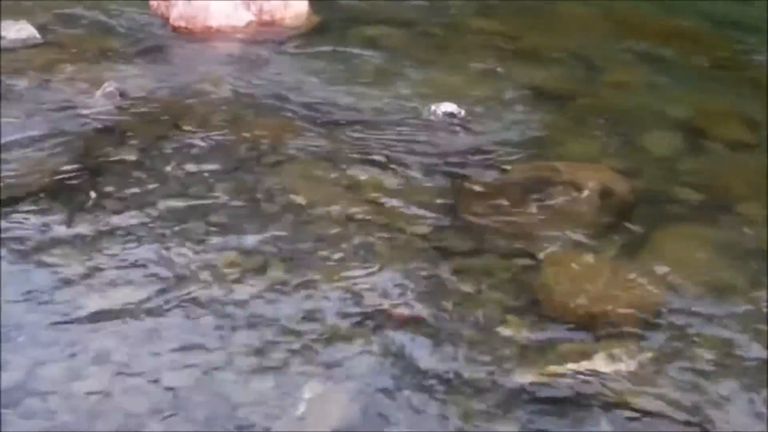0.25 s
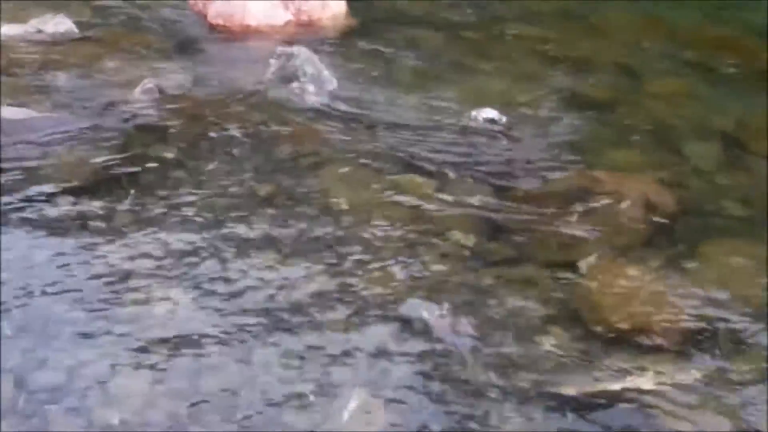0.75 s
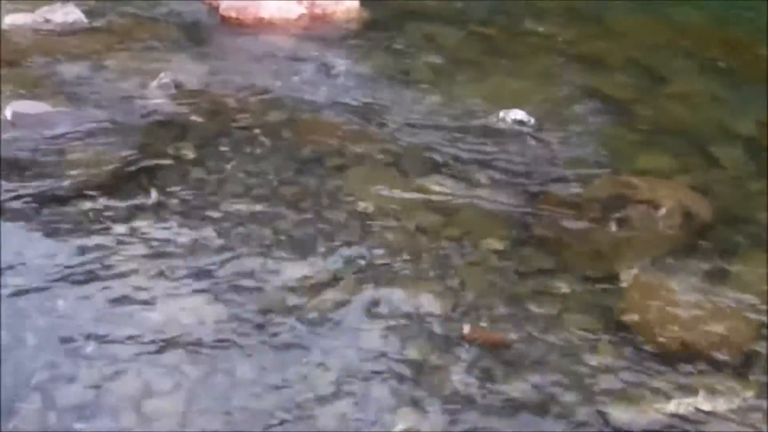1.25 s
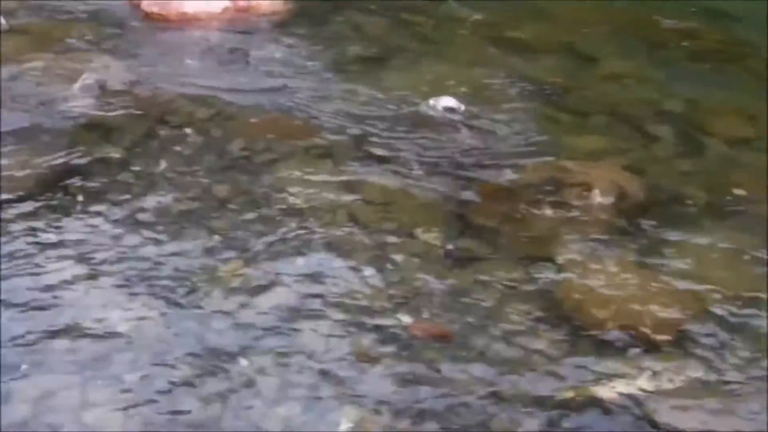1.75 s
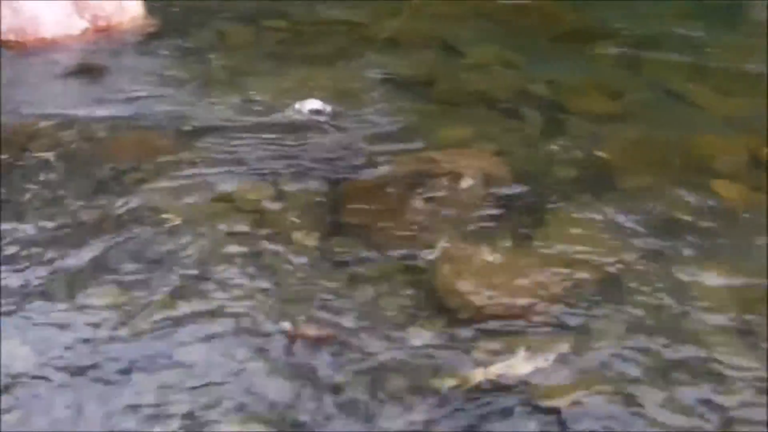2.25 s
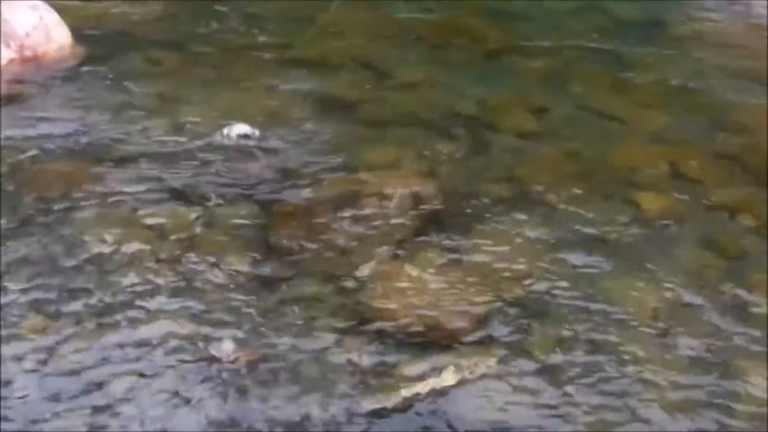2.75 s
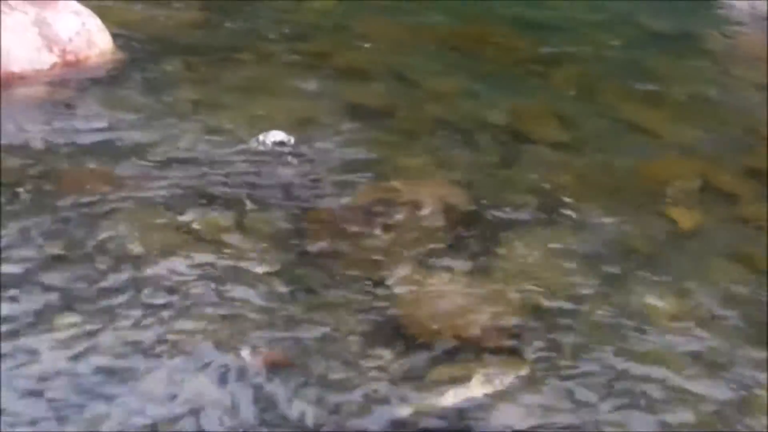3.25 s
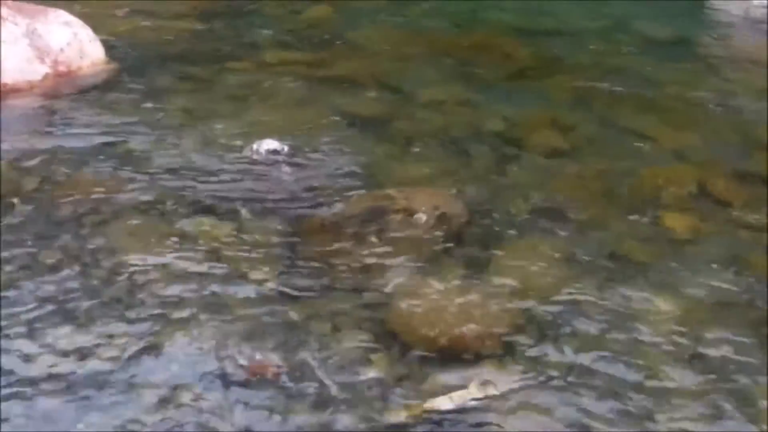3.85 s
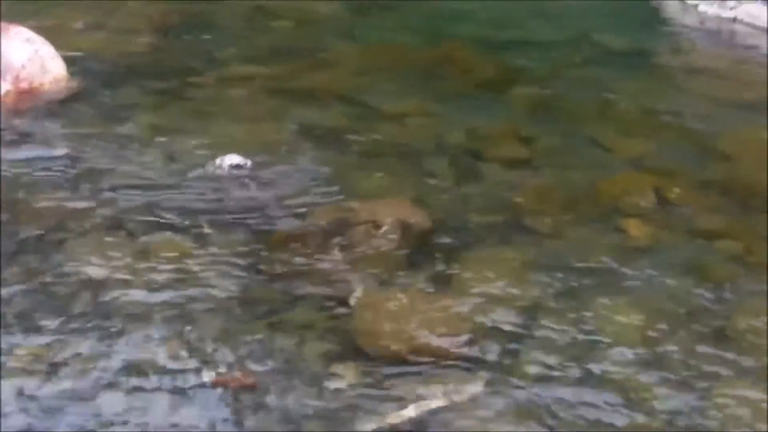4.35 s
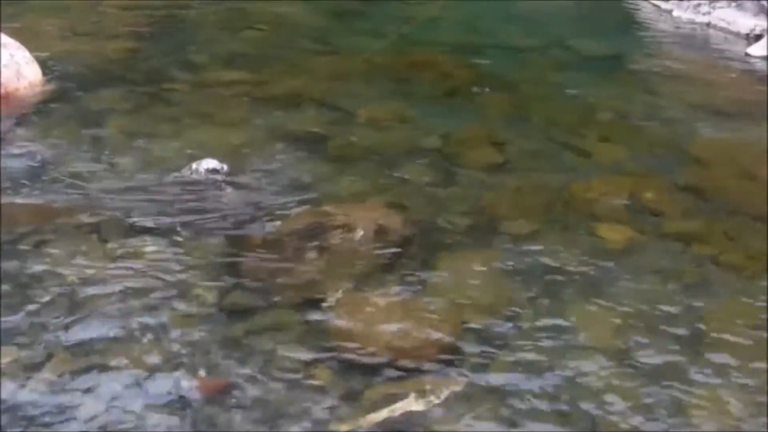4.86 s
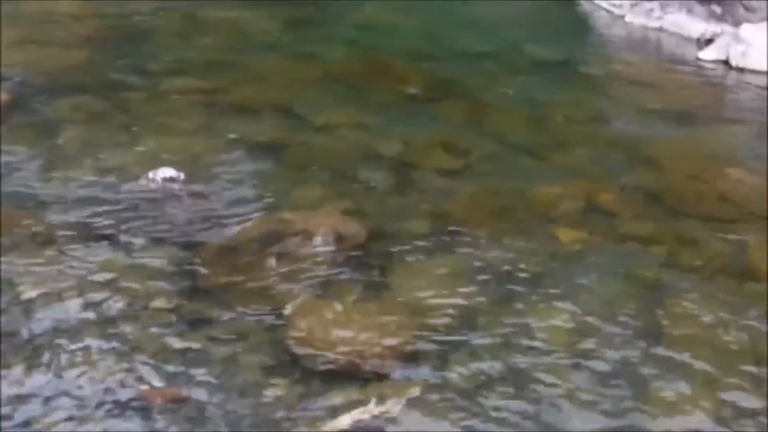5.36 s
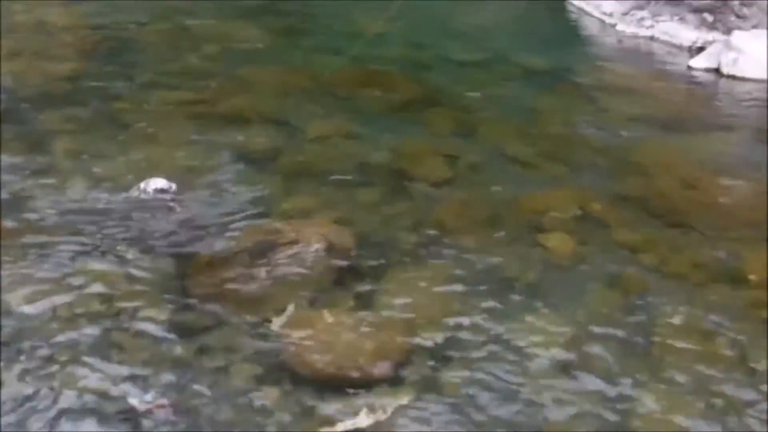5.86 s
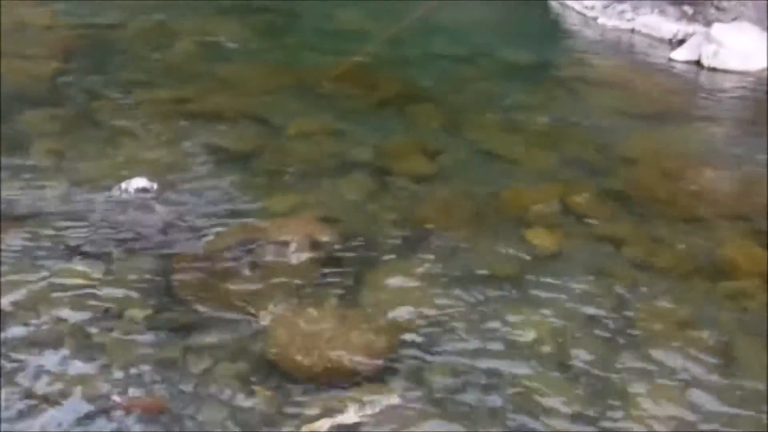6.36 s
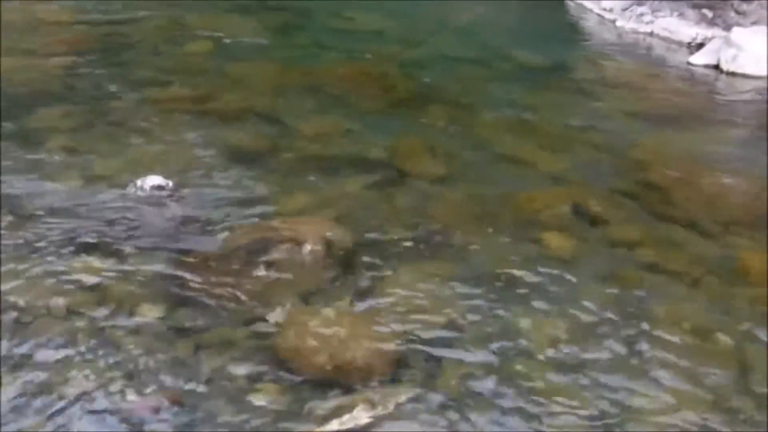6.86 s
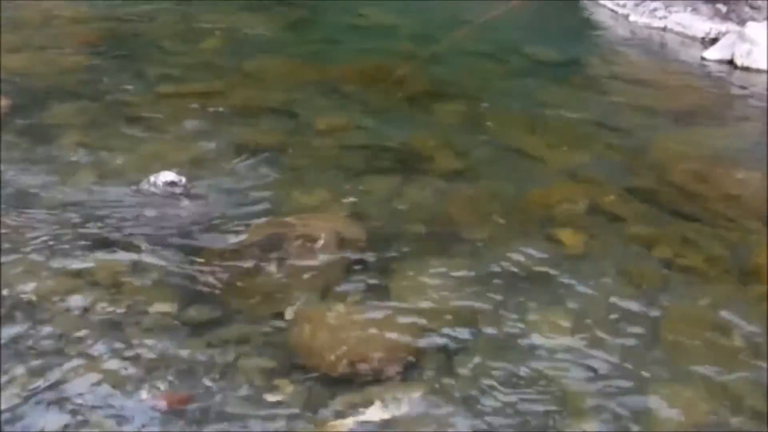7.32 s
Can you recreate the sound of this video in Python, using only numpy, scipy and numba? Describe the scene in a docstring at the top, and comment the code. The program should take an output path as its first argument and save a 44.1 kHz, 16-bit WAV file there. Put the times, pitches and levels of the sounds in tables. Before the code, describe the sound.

A steady river riffle hisses and gurgles quietly, never swelling much. A few drops tick, then a small quick plop sprays tiny high drips. After a second of plain water, a likely fishing reel close by zips in brief bright pulls, spaced about a second apart; hard little metal snaps come before the final pull. Mono-like, close and echo-free, with slightly dulled extreme treble.

```python
"""A shallow river in the open air, without echo: countless small bubbles over an even rush of noise.
Close to the microphone is most likely a fishing reel. Line is drawn off in short rasping pulls (noise
through resonances); metal parts click between the last two pulls (snap, scrape and ring together).
Before the pulls, something small plops in and throws drops, built from short ringing bubbles.
Both channels are the same."""
import sys
import numpy as np
from scipy import signal
from scipy.fft import rfft, irfft
from scipy.io import wavfile
from scipy.ndimage import map_coordinates
from numba import njit

SR = 44100
rng = np.random.default_rng(int(sys.argv[2]) if len(sys.argv) > 2 else 0)


def transcribe(signal):
    """Save signal, clipped to [-1, 1], as a 16-bit WAV file at the path in sys.argv[1]."""
    frames = np.atleast_2d(signal).T
    limited = np.clip(frames, -1, 1)
    pcm = np.round(limited * 32767).astype(np.int16)
    wavfile.write(sys.argv[1], SR, pcm)


N = 334716

# pulls of line: start_s, speed_up_s, slow_down_s, level_db,
# then the shares low_ring_db, mid_ring_db, spool_ring_db, high_ring_db, edge_db
LINE_PULLS = [(2.328, 0.042, 0.067, -40, 0, -5, -6, -13, -17),
              (2.432, 0.21, .135, -32.5, -4, -9, -1.5, -9.5, -11.5),
              (2.959, 0.093, 0.092, -31, -5, -3.5, -3, -5, -11),
              (3.901, .083, 0.084, -33, -4, -3.5, -7, -5, -12),
              (4.942, 0.12, 0.047, -30.5, -3.5, -14, -1, -11, -9),
              (5.885, 0.16, .032, -34.5, -5, -11, -8.5, -8, -9)]
# resonances of the reel under the sliding line: pitch_hz, width_hz, level_db
LOW_RING = [(4130, 630, 0.5), (4295, 50, 5), (4840, 620, 2.5)]
MID_RING = [(6220, 250, -6), (6500, 110, 7.5), (7030, 480, 3)]
SPOOL_RING = [(9100, 360, -2.7), (8930, 55, 2.2), (9570, 91, 0.15)]
HIGH_RING = [(10160, 270, 1), (10300, 90, 1), (10360, 780, 0)]
# the reel's frame: pitch_hz, width_hz, level_db
FRAME_RING = [(2320, 540, -3), (3000, 810, -11.5), (6000, 920, -1.5), (8250, 1040, 0.5)]
# the sharp edge on the rasp: pitch_hz, width_hz, level_db
SHARP_EDGE = [(11800, 1900, -3.5), (14400, 2500, -8)]
# clicks of the reel's metal parts: start_s, snap_db, pitch_hz, scrape_decay_s, ring_db
METAL_CLICKS = [(5.1164, -22, 11800, .0008, -21), (5.1212, -21, 5030, .001, -36),
                (5.1238, .5, 10600, .003, -36), (5.127, -15, 12000, .0006, -37),
                (5.1297, -15, 9000, 0.0037, -27), (5.1495, -12, 9000, 0.0027, -23.5),
                (5.4645, -17, 8800, 0.0026, -20), (5.476, -16.5, 7000, .0026, -26.5),
                (5.4809, -21, 7200, 0.0015, -34), (5.492, -30, 11500, .0002, -25),
                (5.5211, -28, 7640, .0003, -36)]
# what those parts ring with: pitch_hz, level_db, t60_s (time to fade by 60 dB)
METAL_MODES = [(5160, -10, .03), (6900, 8, 0.024), (7690, -6, .02), (8100, -6, .02), (9020, 10, 0.046),
               (9360, -10, .025), (11960, -7, .025), (13000, 1, .03)]
# phases of the plop (entry, slap, wash, cavity, its collapse, falling spray):
# start_s, rise_s, decay_s, level_db, bubble_pitch_hz, spread_octaves (each way)
PLOP_PHASES = [(.708, 0.021, 0.019, -28.5, 5200, 1.07), (.731, 0.004, .011, -27, 1670, 0.62),
               (.752, 0.0084, 0.039, -34.5, 4240, 1.26), (.797, 0.023, .046, -33, 1250, 1.1),
               (.827, .008, 0.059, -33.5, 6180, 1.18), (.9, 0.029, .11, -40, 3430, 1.7)]
# drops and bubbles that stand out: start_s, peak_db (approximate), pitch_hz, ring_cycles
SINGLE_DROPS = [(.327, -28.5, 4280, 53), (0.4448, -15.5, 5200, 7.7), (.585, -19.5, 9100, 47),
                (.7465, -27, 950, 14), (0.8438, -21, 1310, 12), (.857, -22, 1970, 23),
                (.8718, -16, 3060, 10), (.9105, -24, 2440, 12), (.945, -28, 5230, 19),
                (0.9896, -12, 9600, 6.6), (1.007, -16, 7560, 17), (1.013, -17, 8100, 30),
                (1.0844, -16, 2980, 5), (1.0894, -10, 7520, 11), (1.0913, -9, 10200, 9.5),
                (1.918, -17, 5860, 3.4), (6.921, -23, 7000, 18)]
# the river's tone colour: pitch_hz, level_db (per Hz)
RIVER_COLOUR = [(18, -53), (30, -28), (71, -31.5), (178, -15), (232, -10.5), (294, -6), (596, -1.5),
                (1060, -2), (1790, -3.5), (2660, -8.5), (4260, -9.5), (6650, -9), (9350, -12), (12800, -22),
                (15800, -23.5)]

RIVER_DB = -41
TOP_HZ = 15650  # top of the treble
SLOW_DB = -4.5  # a ring at or below SLOW_HZ is this much weaker at the slow ends of a pull
SLOW_HZ, SLOW_DB_PER_OCTAVE = 4500, -4.5  # higher rings lose more: a slow line sounds dull
SCRAPE_DB = -20  # the parts rub equally hard in every click
T = np.arange(N) / SR  # time in seconds


def pulls(slip_hz=2600, grain_db=0.75, fade_s=0.0079, frame_db=-8, wobble_db=1.1):
    """Thousands of tiny slips a second, plus hiss, ring the reel; faster line sounds brighter."""
    jerks = (rng.random(N) < slip_hz / SR) * rng.standard_normal(N)
    hiss = 2.7 * rng.standard_normal(N)
    friction = (unit(jerks) + hiss) * undb(grain_db * walk(300))
    friction = band(friction, low_hz=990, high_hz=19000)

    # the rings waver in pitch as the spool turns
    waver = .005 * walk(14)
    parts = (LOW_RING, MID_RING, SPOOL_RING, HIGH_RING, SHARP_EDGE, FRAME_RING)
    rings = [resonate(friction, modes) * undb(wobble_db * walk(35)) for modes in parts]
    slow_db = []
    for modes in parts:
        octaves_up = max(np.log2(modes[0][0] / SLOW_HZ), 0)
        slow_db.append(SLOW_DB + SLOW_DB_PER_OCTAVE * octaves_up)

    out = np.zeros(N)
    for start, rise, fall, db, *shares in LINE_PULLS:
        end = start + rise + fall
        i = np.flatnonzero((T > start - fade_s) & (T < end + fade_s))
        # 1 at the slow ends of the pull, 0 at its fastest point
        slowness = np.interp(T[i], [start, start + rise, end], [1, 0, 1]) ** 0.81
        inside_s = np.minimum(T[i] - start, end - T[i])
        gate = np.clip(.5 + inside_s / (2 * fade_s), 0, 1)
        rasp = np.zeros(len(i))
        for ring, share, slow in zip(rings, shares + [frame_db], slow_db):
            rasp += ring[i] * undb(share + slow * slowness)
        # reading the rasp at an uneven speed bends its pitch
        read_at = np.cumsum(1 + waver[i])
        out[i] += gate * undb(db) * map_coordinates(rasp, [read_at], order=5)
    return out


def clicks(width_octaves=0.26, snap_s=.0001):
    """A snap, a scrape and a ring begin together; metal modes near the snap's pitch ring most readily."""
    out, t = np.zeros(N), T[:2048]
    for start, db, hz, decay, ring_db in METAL_CLICKS:
        snap = t / snap_s * np.exp(1 - t / snap_s) * np.sin(2 * np.pi * hz * t)
        scrape = rng.standard_normal(len(t)) * np.exp(-t / decay)
        scrape = band(scrape, hz * 2 ** -width_octaves, hz * 2 ** width_octaves, order=1)
        ring = np.zeros(len(t))
        for mode_hz, mode_db, t60 in METAL_MODES:
            nearness = 1 / (1 + (np.log2(mode_hz / hz) / width_octaves) ** 2)
            ring += nearness * undb(mode_db - 60 * t / t60) * np.sin(2 * np.pi * mode_hz * t)
        click = undb(db) * snap
        click += undb(SCRAPE_DB) * scrape / abs(scrape).max()
        click += undb(ring_db) * ring / abs(ring).max()
        add(out, start, click)
    return band(out, low_hz=1500, high_hz=14900)


def splash(cycles=20, scatter_db=1.0, count=380):
    """Each phase of the plop is a cloud of short bubbles that swells and dies away."""
    out = np.zeros(N)
    for start, rise, decay, db, hz, octaves in PLOP_PHASES:
        when, luck, pitch = rng.random((count, 3)).T
        age = when * (rise + 4 * decay)
        swell = np.minimum(age / rise, 1)
        die_away = np.exp(-np.maximum(age - rise, 0) / decay)
        size = swell * die_away * undb(-scatter_db * np.log(1 - .95 * luck))
        pitches = np.minimum(hz * 2 ** (octaves * (2 * pitch - 1)), TOP_HZ)
        cloud = bubbles(start + age, pitches, np.full(count, 1. * cycles), size * np.sqrt(pitches), 0.13)
        # even out the clouds' strength over their rise and decay
        strength = np.sqrt(np.sum(cloud ** 2) / (SR * (rise + decay) / 2))
        out += undb(db) * cloud / strength
    return band(out, low_hz=420, high_hz=14000)


def drops():
    """Single drops ping on the surface; each traps a second, smaller bubble just after."""
    start, db, hz, cycles = np.array(SINGLE_DROPS, float).T.copy()
    first = bubbles(start, hz, cycles, 1.28 * undb(db), 0.044)
    second = bubbles(start + .0008, 1.01 * hz, cycles, 0.4 * undb(db), .05)
    return band(first + second, low_hz=420, high_hz=14000)


def river():
    """Rush, gurgling bubbles, fine fizz and a few clear trickles share one colour and a steady level."""
    gurgle = babble(low_hz=599.4, high_hz=3200, cycles=77.0, scatter_db=1.0, count=5000)
    fizz = babble(low_hz=2220, high_hz=12960, cycles=128, scatter_db=2.0, count=9000)
    trickle = babble(low_hz=901.0, high_hz=5006, cycles=208, scatter_db=0.0, count=700)
    bed = rush(flicker_db=1.18, swell_db=0.07)
    mix = bed + undb(-13.0) * gurgle + undb(-8.0) * fizz + undb(-15.5) * trickle
    return unit(colour(mix, RIVER_COLOUR)) * undb(RIVER_DB)


def babble(low_hz, high_hz, cycles, scatter_db, count):
    """Bubbles among the stones, at random times and pitches; scatter makes a few stand out."""
    when, pitch, ring, luck = rng.random((count, 4)).T
    hz = low_hz * (high_hz / low_hz) ** pitch
    size = hz * undb(scatter_db * np.minimum(-np.log(1 - luck), 5))
    return unit(bubbles(when * N / SR, hz, cycles * (.5 + ring), size, 0.186))


def rush(flicker_db, swell_db):
    """The merged sound of the riffle further off: bands of noise that swell together and flicker alone."""
    f = np.maximum(np.fft.rfftfreq(N, 1 / SR), 1)
    noise, swell, out = rfft(rng.standard_normal(N)), walk(4.08), 0
    for half_octave in np.arange(9, 29):  # centres from about 23 Hz to 16 kHz
        share = np.maximum(1 - abs(2 * np.log2(f) - half_octave), 0)
        level_db = flicker_db * walk(22) + swell_db * swell
        out = out + irfft(noise * share, N) * undb(level_db)
    return unit(out)


@njit
def bubbles(start_s, hz, cycles, size, glide):
    """Each bubble swells within a cycle and rings for some cycles down to -60 dB while its pitch rises."""
    out = np.zeros(N)
    for k in range(len(hz)):
        first, length = int(start_s[k] * SR), int(cycles[k] * SR / hz[k]) + 2
        step = 2 * np.pi * hz[k] / SR  # phase turned per sample
        fade = np.exp(-np.log(1000) / length)
        a, phase, last = size[k], 0., 0.
        for i in range(min(length, N - first)):
            phase += min(step * (1 + glide * i / length), .9 * np.pi)
            flow = a * np.sin(phase) * phase ** 2 / (phase ** 2 + 12)
            out[first + i] += (flow - last) / step  # pressure follows the change of flow
            a, last = a * fade, flow
    return out


def resonate(x, modes):
    """Pass x through steep resonances, which favour pitches near their own; result has rms 1."""
    power = 0
    f = np.fft.rfftfreq(N, 1 / SR)
    for hz, width, db in modes:
        power = power + undb(db) ** 2 / (1 + (2 * (f - hz) / width) ** 2) ** 2
    return unit(irfft(rfft(x) * np.sqrt(power), N))


def colour(x, points):
    """Shape the tone by a curve through (pitch_hz, level_db) points."""
    hz, db = np.transpose(points)
    f = np.maximum(np.fft.rfftfreq(N, 1 / SR), 1)
    return irfft(rfft(x) * undb(np.interp(np.log(f), np.log(hz), db)), N)


def band(x, low_hz, high_hz, order=2):
    """Keep mainly the pitches between two limits."""
    limits = [low_hz, min(high_hz, .45 * SR)]
    return signal.sosfilt(signal.butter(order, limits, "bandpass", fs=SR, output="sos"), x)


def walk(rate):
    """Slow chance: random levels, rate per second, joined by straight lines; spread near 1."""
    knots = rng.standard_normal(4096)
    return 1.3 * np.interp(T * rate, np.arange(len(knots)), knots)


def undb(db):
    """Turn decibels into a gain."""
    return 10 ** (np.asarray(db) / 20)


def unit(x):
    """Scale to an average strength (rms) of 1."""
    return x / np.sqrt(np.mean(x ** 2) + 1e-20)


def add(out, start_s, x):
    """Mix a short sound in at its time."""
    i = max(int(start_s * SR), 0)
    out[i:i + len(x)] += x[:max(len(out) - i, 0)]


def scene():
    """Reel, plop and river, heard from one point."""
    mono = pulls() + clicks() + splash() + drops() + river()
    return np.tile(mono, (2, 1))


def record(dry):
    """The recorder cuts the treble steeply above TOP_HZ."""
    return signal.sosfilt(signal.ellip(10, .2, 70, TOP_HZ, fs=SR, output="sos"), dry)


dry = scene()
out = record(dry)
transcribe(out)
```